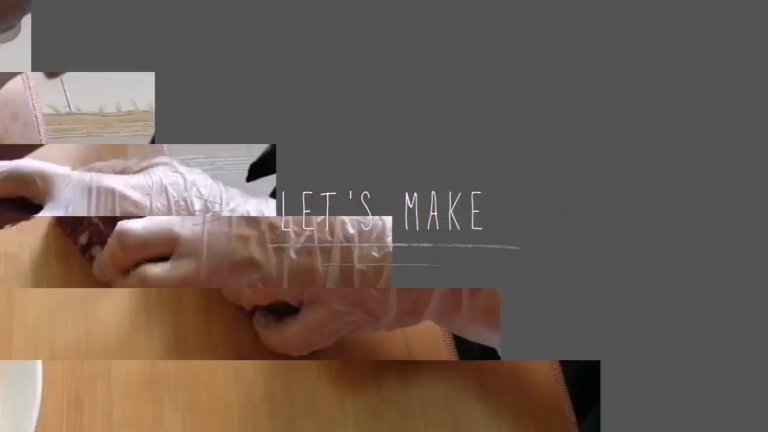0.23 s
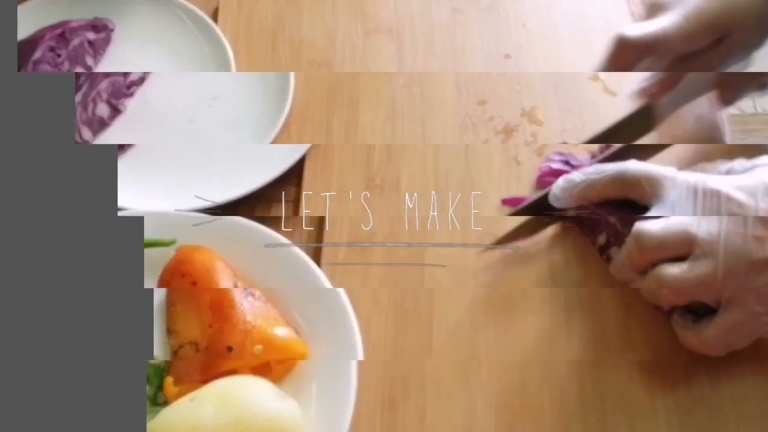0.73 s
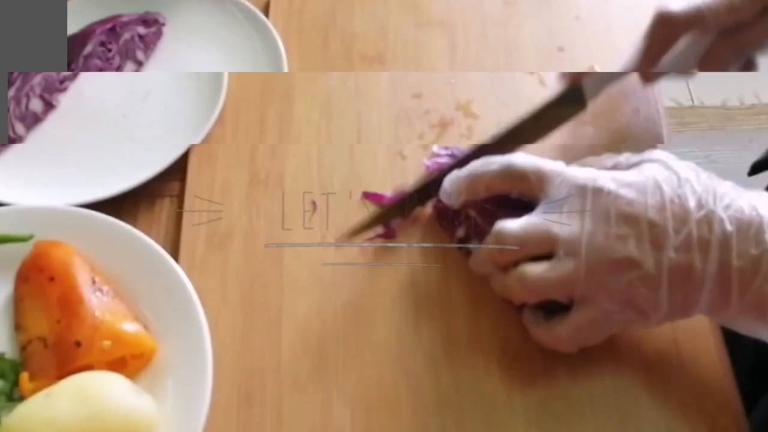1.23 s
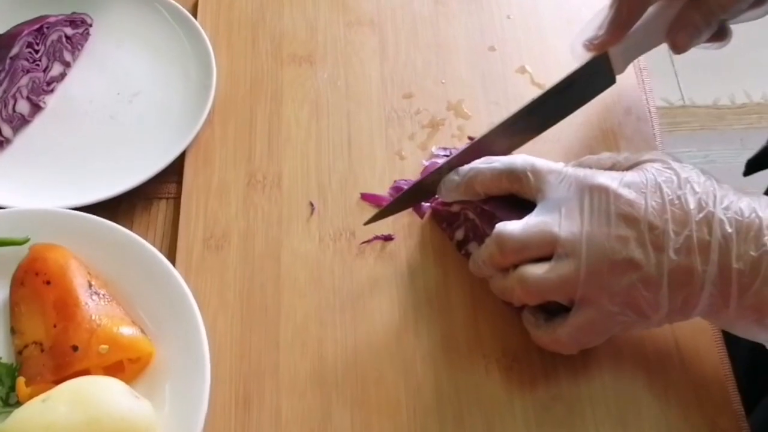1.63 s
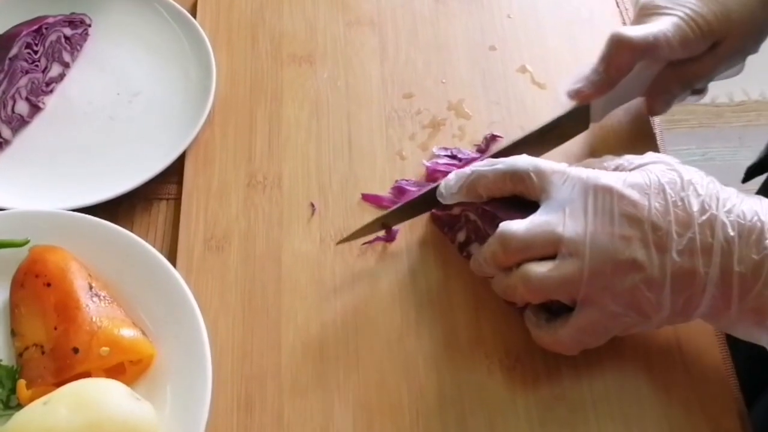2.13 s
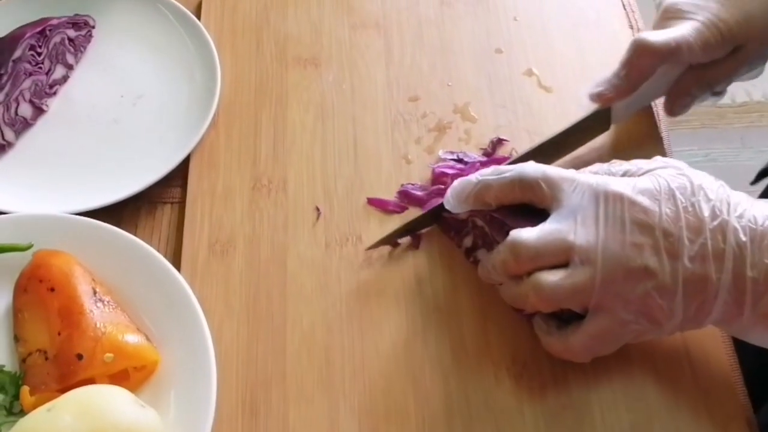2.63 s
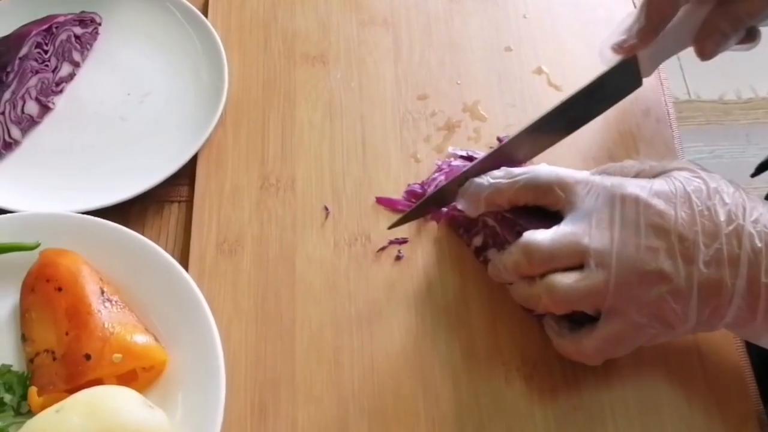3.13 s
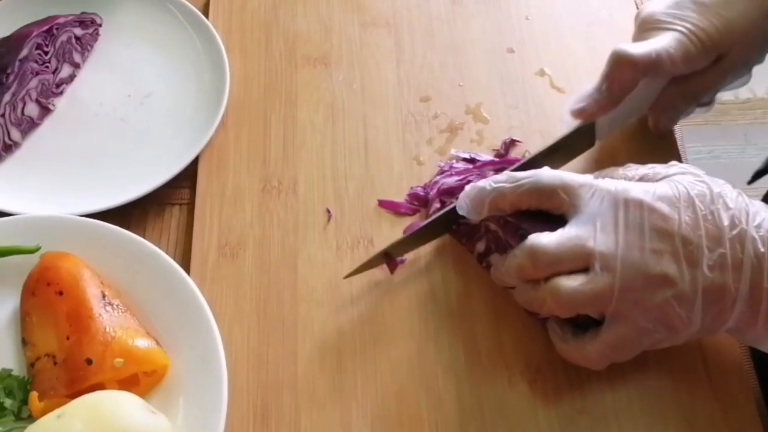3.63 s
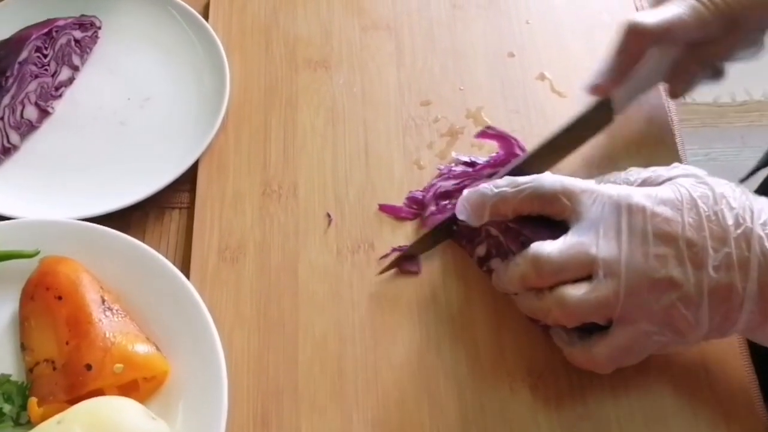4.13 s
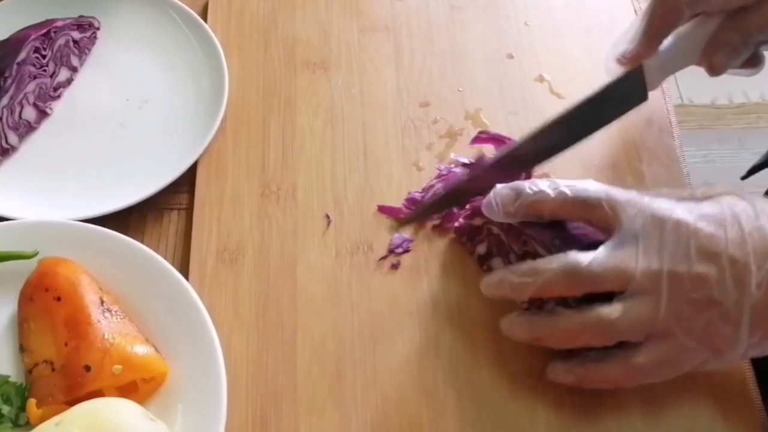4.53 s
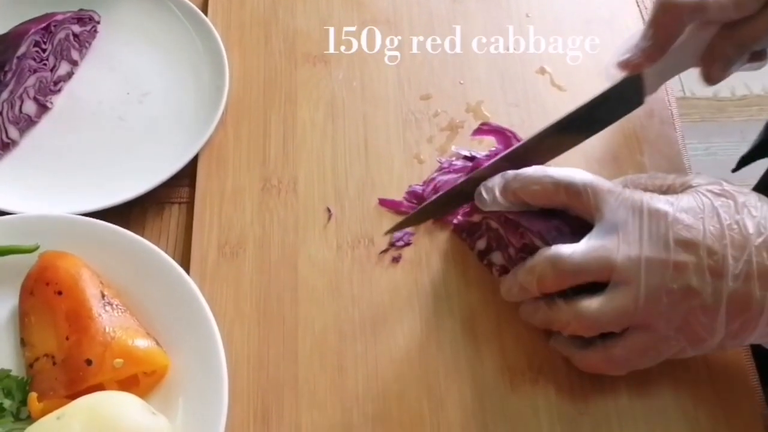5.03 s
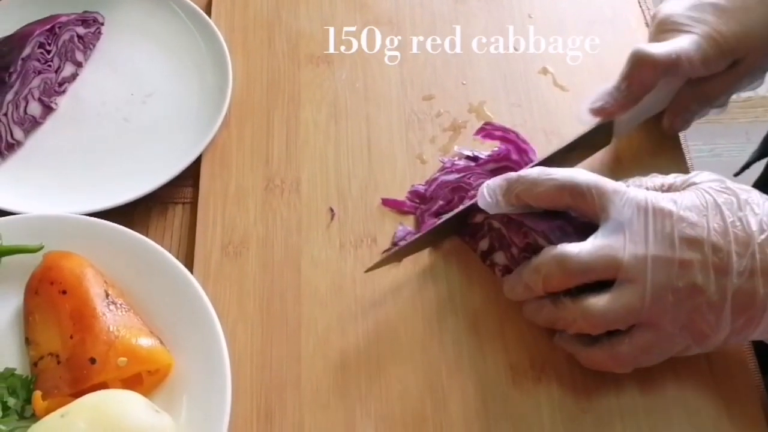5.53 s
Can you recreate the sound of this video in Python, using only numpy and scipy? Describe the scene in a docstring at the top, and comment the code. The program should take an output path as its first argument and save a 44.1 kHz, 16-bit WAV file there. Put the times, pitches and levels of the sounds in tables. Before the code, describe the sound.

A quiet small kitchen: faint airy hiss and low, wavering appliance hum throughout. From about 0.4 s a knife presses into crisp cabbage, a grainy crunch that swells and cuts off. It strengthens at 0.95 s with a sharp snap and ends at 1.0 s in a hard, short woody knock with brief room echoes. Softer tearing follows to 1.3 s, then a lull. Light crunches and snaps return at 2.0-2.3 s; a strong crunch at 2.6 s ends in the loudest knock, with a dull little tap at 2.7 s. After near silence, ticks and crackling tears build from 3.3 s, densest around 3.7 s, and a weaker, duller knock lands to the right at 4.0 s. A faint tear and tick follow, then quiet until crunches and snaps at 5.1-5.5 s and a last crisp bite near 5.75 s. Close stereo, treble brighter on the right, background dipping briefly at loud hits.

```python
"""A chef's knife shreds red cabbage on a wooden board in a small kitchen.
Throughout, room air hisses and appliances hum faintly: shaped noise and wavering tones.
From 0.4 s strokes crunch through leaf layers (dense random clicks) and ribs snap (click and crumble).
Near 1.0, 2.6 and 4.0 s a stroke ends in a board knock (damped modes, echoes); a dull tap follows at 2.7 s.
The right microphone rings in the treble; gain control dips at loud sounds."""
import sys
import numpy as np
from scipy import signal
from scipy.fft import rfft, irfft
from scipy.io import wavfile
from scipy.ndimage import uniform_filter1d

SR = 44100
rng = np.random.default_rng(int(sys.argv[2]) if len(sys.argv) > 2 else 0)


def generate_wav(signal):
    """Clip the signal to [-1, 1] and save it as 16-bit WAV at the path in sys.argv[1]."""
    frames = np.transpose(np.atleast_2d(signal))
    scaled = np.clip(frames, -1, 1) * 32767
    pcm = np.round(scaled).astype(np.int16)
    wavfile.write(sys.argv[1], SR, pcm)


N = 254898
TIME_S = np.arange(N) / SR

# Blade bites into leaf layers. Each row: time of full pressure in s, swell in s, hold in s,
# relative level in dB, depth as dB of leaf body over fizz, lean to the right in dB.
BITES = [(0.492, 0.18, 0.021, -58, -2, -.5), (0.705, .03, 0.056, -50.5, -8, 2),
         (0.805, .03, .09, -63.5, -16, 0), (0.974, 0.024, 0.01, -39, -2, 2),
         (1.115, 0.051, 0.033, -58.5, -1.5, 1), (1.261, 0.091, 0.022, -57, -4, 4),
         (1.981, 0.036, 0.079, -62, -3, 1), (2.082, .01, 0.024, -56.5, -6, -1.5),
         (2.265, .075, 0.039, -54, -3.5, 0.5), (2.47, 0.17, 0.0074, -61.5, -3.5, -1.5),
         (2.575, 0.023, .003, -37.5, -2.5, -1), (3.47, 0.18, 0.03, -58, -5.5, 1),
         (3.541, .04, 0.057, -60.5, -6, 0), (3.707, 0.094, 0.054, -51.5, -2, 1),
         (3.983, 0.04, 0.028, -47.5, 0.5, -4.5), (4.19, .012, 0.051, -65, -1.5, -2),
         (5.13, .008, .09, -60, -2, 1), (5.245, 0.035, 0.023, -49, -5, -1),
         (5.307, .03, .085, -59.5, -8, -3), (5.428, 0.071, 0.023, -46, -3.5, -2.5),
         (5.48, .02, .008, -57, 0, -0.5), (5.757, 0.11, .035, -51.5, -3, 2)]
# Spectrum of torn cells. Each row: frequency in Hz, relative density in dB per Hz.
FIZZ_SPECTRUM = [(300, -35), (1500, -10.5), (3000, -11), (4000, -7), (5300, 3), (6700, -1.5), (7900, -4.5),
                 (9500, -3), (11500, -9), (16000, -12)]
# Spectrum of the thick of the leaf. Each row: frequency in Hz, relative density in dB per Hz.
LEAF_SPECTRUM = [(100, -26), (400, -11), (620, -10), (820, 3.5), (1050, 2), (1600, -3), (2500, -2),
                 (3200, 0), (3900, -15.5), (7000, -34), (16000, -46.5)]


def crunch():
    """The edge tears cells in bursts: bright fizz, with more leaf body where the cut is deep."""
    fizz, body = np.zeros((2, N))
    for full_s, swell_s, hold_s, level_db, depth_db, _ in BITES:
        bite = amp(level_db + pressure_db(full_s, swell_s, hold_s))
        fizz = np.maximum(fizz, bite)
        body = np.maximum(body, amp(depth_db) * bite)
    cells = grains(per_s=2600, spread_db=3.5, clump_db=5.0, clump_hz=86)
    bright = amp(-3.5) * colour(cells * fizz, FIZZ_SPECTRUM)
    thick = amp(-2.5) * colour(cells * body, LEAF_SPECTRUM)
    return bright + thick


# pressure rises by SWELL_DB over a bite's swell time
SWELL_DB, RELEASE_DB_PER_S = 22.5, 522


def pressure_db(full_s, swell_s, hold_s):
    """The blade leans in, holds while the layer tears, then lets go; 0 dB at full pressure."""
    building = SWELL_DB * np.maximum(full_s - TIME_S, 0) / swell_s
    letting_go = RELEASE_DB_PER_S * np.maximum(TIME_S - full_s - hold_s, 0)
    return -np.minimum(building + letting_go, 200)


def grains(per_s, spread_db, clump_db, clump_hz):
    """Cells burst as one-sample clicks of uneven size, in clumps as the edge passes each leaf."""
    size = amp(spread_db * np.minimum(rng.exponential(1, N), 4))
    sign = rng.choice([-1., 1.], N)
    bursts = rng.random(N) < per_s / SR
    clumps = amp(clump_db * np.tanh(drift(clump_hz)))
    return evened(size * sign * bursts * clumps)


# Single leaf ribs break. Each row: time in s, relative peak in dB, body over fizz in dB.
SNAPS = [(0.9487, -35, -12), (.9685, -24, -9), (1.982, -37, -1), (2.083, -26.5, -11), (2.218, -36.5, -7),
         (2.265, -37, -11), (3.33, -38.5, -3.5), (3.4766, -31.5, -11), (3.546, -35.5, -6),
         (3.5837, -34, -14), (3.6605, -31.5, -7), (3.704, -26.5, -6), (3.726, -31, 4), (3.7635, -29.5, 2.5),
         (3.9645, -38, -5), (4.4064, -37.5, -13), (5.123, -31.5, -1), (5.195, -40, -15), (5.2085, -34, -10),
         (5.417, -33, -9), (5.4458, -28, -6), (5.7419, -35, 3)]


def snaps(level_db=-6.0, crumble_s=0.0034, crumble_db=-11, delay_s=.0007, size=900):
    """A rib breaks with one sharp click and a brief, decaying crumble."""
    t = np.arange(size) / SR
    fizz, body = np.zeros((2, N))
    for start_s, peak_db, body_db in SNAPS:
        crack = amp(crumble_db) * rng.choice([-1., 1.], size) * np.exp(-t / crumble_s)
        crack[0] = 1
        add(fizz, start_s + delay_s, amp(peak_db) * crack)
        add(body, start_s + delay_s, amp(peak_db + body_db) * crack)
    return amp(level_db) * (colour(fizz, FIZZ_SPECTRUM) + amp(-2) * colour(body, LEAF_SPECTRUM))


# Blade meets board. Each row: time in s, relative force in dB, hardness in dB per octave,
# lean of the direct sound to the right in dB.
KNOCKS = [(0.9811, -1.5, 0, 2), (2.5807, 1.5, 0, -1), (4.0036, -8, -3, 11.5)]
# Damped modes of board and blade. Each row: nominal frequency in Hz, relative level in dB, swell in s.
BOARD_MODES = [(500, -24.5, 0.0009), (1083, -4, 0.0009), (2450, -10.5, 0.0013), (3165, -24, 0.0034),
               (4680, -16, 0.0008), (6960, -21, 0.0016), (9600, -26, 0.00036)]
# Spectrum the struck board throws into the room. Each row: frequency in Hz, relative density in dB per Hz.
THOCK_SPECTRUM = [(200, -27), (480, -16), (640, -13), (845, 6.5), (1000, -0.5), (1210, 0.5), (1400, -4.5),
                  (2700, -6.5), (3200, -3.5), (3900, -15), (5500, -8.5), (7800, -22), (9500, -20),
                  (16000, -34)]


def knocks(level_db=-8, room_db=6.0, lag_s=.00002, size=900):
    """The blade excites heavily damped modes, a thock of a few cycles; then the kitchen answers."""
    t = np.arange(size) / SR
    direct, thrown = np.zeros((2, N)), np.zeros(N)
    for start_s, force_db, hardness, lean_db in KNOCKS:
        for ear, side in zip(direct, (-1, 1)):  # left, right
            for hz, mode_db, swell_s in BOARD_MODES:
                shape = (t / swell_s * np.exp(1 - t / swell_s)) ** 2
                mode_gain_db = level_db + force_db + mode_db + brightness_db(hardness, hz)
                gain = amp(mode_gain_db + side * lean_db / 2)
                tone = np.sin(2 * np.pi * hz * rng.uniform(.97, 1.03) * t)
                add(ear, start_s + side * lag_s, gain * shape * tone)
        blow = np.zeros(N)
        add(blow, start_s, amp([room_db + force_db]))
        spectrum = [(hz, db + brightness_db(hardness, hz)) for hz, db in THOCK_SPECTRUM]
        thrown += colour(blow, spectrum)
    return direct + kitchen(thrown)


def brightness_db(hardness_db_per_octave, hz):
    """A harder blow tilts the spectrum up over the two octaves above the board's main mode."""
    return hardness_db_per_octave * np.clip(np.log2(hz / BOARD_MODES[1][0]), 0, 2)


# Light blade taps on the board. Each row: time in s, relative level in dB.
TAPS = [(2.723, -33.5)]


def thuds(level_db=8, delay_s=0.00068):
    """A light tap gives the board one impulse, filtered to a short, dull thud."""
    impulses = np.zeros(N)
    for start_s, db in TAPS:
        add(impulses, start_s + delay_s, amp([db + level_db]))
    return colour(impulses, [(60, -27), (250, 9), (650, 4), (1300, -3), (6000, -33)])  # Hz, dB per Hz


def cutting(wet_db=1.5, snap_wet_db=-4):
    """Leaf and tap sounds pan with the blade; direct sound reaches the left a sample sooner."""
    tearing, clicks = crunch(), snaps() + thuds()
    near = tearing + clicks
    direct = np.array([near, np.roll(near, 1)])
    echoes = kitchen(amp(wet_db) * tearing + amp(snap_wet_db) * clicks)
    bite_s, *_, bite_lean_db = np.transpose(BITES)
    lean_db = np.interp(TIME_S, bite_s, bite_lean_db)
    return (direct + echoes) * amp([-lean_db / 2, lean_db / 2])


# Decay of the kitchen. Each row: frequency in Hz, time to fall 60 dB in s.
ROOM_T60 = [(200, 0.24), (900, 0.24), (2500, 0.29), (5500, 0.27), (14000, 0.26)]
# Likeness of left and right for echoes and air. Each row: frequency in Hz, likeness from 0 to 1.
LIKENESS = [(30, 1), (130, 0.59), (290, 0.73), (640, 0.55), (1400, 0.022), (6000, 0.014)]


def kitchen(x, early=0.54, early_s=0.0058, size=20000, slot=8):
    """Dense echoes from worktop and walls, alike at both microphones only in the bass."""
    slots = np.arange(80, size - slot, slot)
    at = slots + rng.integers(0, slot, (2, len(slots)))
    taps = np.zeros((2, size))
    np.put_along_axis(taps, at, rng.choice([-1., 1.], at.shape), 1)
    hz, t, (left, right) = signal.stft(taps, SR, nperseg=256)
    pair = partly_alike(left, right, read(LIKENESS, hz)[:, None])
    decay = amp(-60 * t / read(ROOM_T60, hz)[:, None])
    fade = decay * (1 + early * np.exp(-t / early_s))
    tail = signal.istft(pair * fade, SR)[1]
    return signal.fftconvolve(x[None], tail / np.linalg.norm(tail[0]), axes=1)[:, :N]


# Spectrum of room air. Each row: frequency in Hz, relative density in dB per Hz.
AIR_SPECTRUM = [(15, -3.5), (65, -7.5), (150, -3.5), (300, -7.5), (480, -8), (650, -14.5), (950, -13),
                (1500, -22), (2200, -23.5), (3100, -21), (3650, -30), (4100, -31.5), (5200, -22.5),
                (7000, -24.5), (11000, -32), (16000, -38)]
AIR_DB = -61
# Appliance hum. Each row: frequency in Hz, relative level in dB, unsteadiness as a ratio.
HUM = [(25.5, -76, 0.35), (43.5, -71, 0.95), (97.7, -71.5, 0.9), (152.5, -78.5, 0.48), (194.7, -70.5, 0.62),
       (450.3, -74.5, 1)]


def background(waver_hz=4):
    """Steady noise for room air; appliance tones wavering in level and phase."""
    hz = np.fft.rfftfreq(N, 1 / SR)
    left, right = rfft(rng.standard_normal((2, N)))
    pair = partly_alike(left, right, read(LIKENESS, hz))
    air = evened(irfft(pair * amp(read(AIR_SPECTRUM, hz)), N))
    hum = np.zeros(N)
    for tone_hz, db, unsteady in HUM:
        waver = 1 + unsteady * (drift(waver_hz) + 1j * drift(waver_hz))
        tone = np.exp(2j * np.pi * (tone_hz * TIME_S + rng.random()))
        hum += amp(db) * np.sqrt(2) * (waver * tone).real
    return amp(AIR_DB) * air + hum * amp([[-1], [.5]])  # left, right in dB


def amp(db):
    """Converts dB to amplitude ratio."""
    return 10 ** (np.asarray(db) / 20)


def evened(x):
    """Scales to rms 1."""
    return x / np.sqrt(np.mean(x ** 2) + 1e-20)


def read(points, hz):
    """Joins (Hz, value) points on a log-frequency axis."""
    f, value = np.transpose(points)
    return np.interp(np.log(hz + 1), np.log(f + 1), value)


def add(mix, start_s, sound):
    """Mixes a sound in at start_s."""
    part = mix[max(round(start_s * SR), 0):][:len(sound)]
    part += sound[:len(part)]


def drift(hz):
    """Slow noise of rms 1: a Gaussian low-pass about hz wide."""
    low_pass = np.exp(-.5 * (np.fft.rfftfreq(N, 1 / SR) / hz) ** 2)
    return evened(irfft(rfft(rng.standard_normal(N)) * low_pass, N))


def colour(x, spectrum, size=2048):
    """A causal, minimum-phase filter of energy 1 with the given spectrum."""
    log_gain = np.log(amp(read(spectrum, abs(np.fft.fftfreq(size, 1 / SR)))))
    response = np.exp(np.conj(signal.hilbert(log_gain)))
    taps = np.fft.ifft(response).real[:size // 2]
    return signal.oaconvolve(x, taps / np.linalg.norm(taps))[:N]


def partly_alike(left, right, likeness):
    """Blends left into right so the two correlate by likeness at each frequency."""
    same = np.clip(likeness, 0, 1)
    return np.array([left, same * left + np.sqrt(1 - same ** 2) * right])


def ducked(x, threshold_db=-42, squeeze=0.47, recover_db_per_s=140):
    """Gain control that looks a little ahead, dips at loud sounds and soon recovers."""
    power = uniform_filter1d((x ** 2).mean(0), size=900)
    power_db = 10 * np.log10(abs(power) + 1e-12)
    fall_db = TIME_S * recover_db_per_s
    held_db = np.maximum.accumulate(power_db + fall_db) - fall_db  # instant rise, steady fall
    over_db = np.maximum(held_db - threshold_db, 0)
    return x * amp(-squeeze * uniform_filter1d(over_db, size=2400))


def scene():
    """Sums cutting, knocks and the quiet kitchen."""
    return cutting() + knocks() + background()


EDGE_HZ = 15900


def record(dry, port_hz=5300, port_q=7, port_db=7):
    """The right microphone's cavity rings; then gain control and a low-pass at EDGE_HZ."""
    ring = signal.lfilter(*signal.iirpeak(port_hz, port_q, SR), dry[1])
    heard = ducked(np.array([dry[0], dry[1] + amp(port_db) * ring]))
    low_pass = signal.firwin(511, EDGE_HZ, window=("kaiser", 9), fs=SR)
    return signal.oaconvolve(heard, low_pass[None], "same")


dry = scene()
out = record(dry)
generate_wav(out)
```